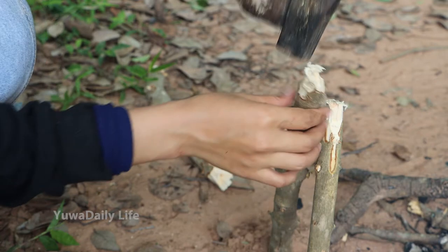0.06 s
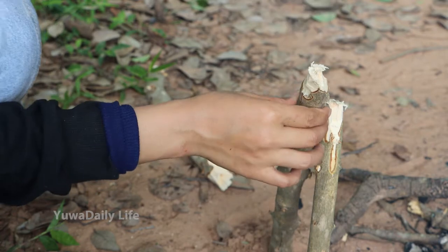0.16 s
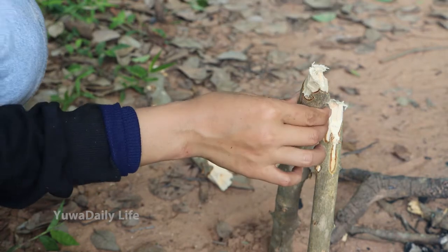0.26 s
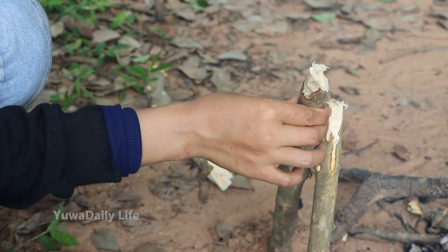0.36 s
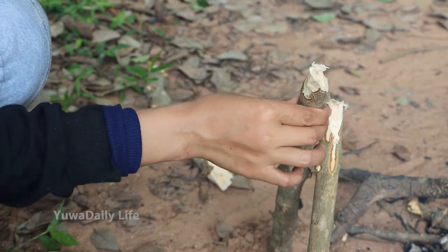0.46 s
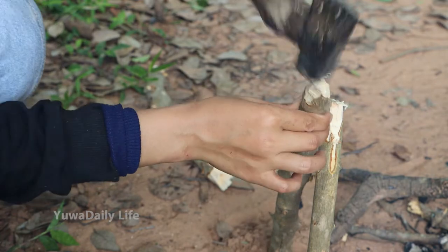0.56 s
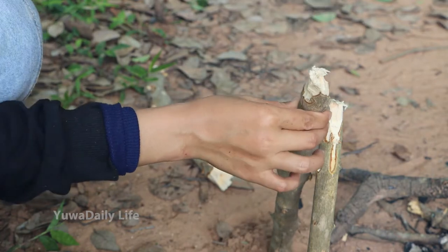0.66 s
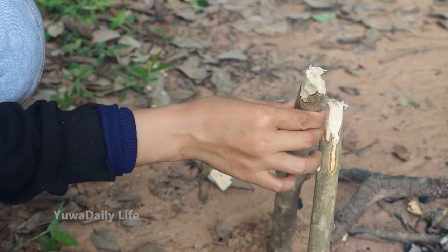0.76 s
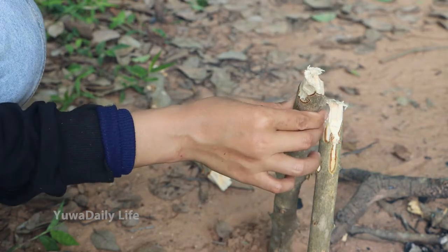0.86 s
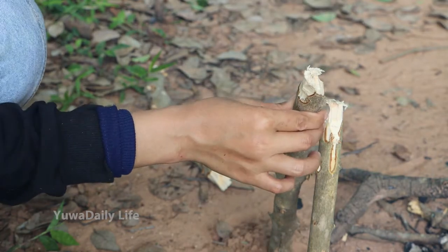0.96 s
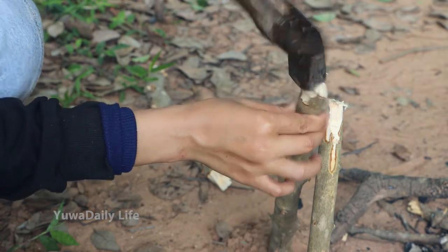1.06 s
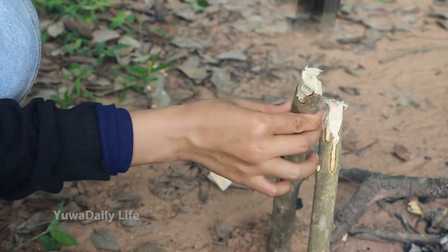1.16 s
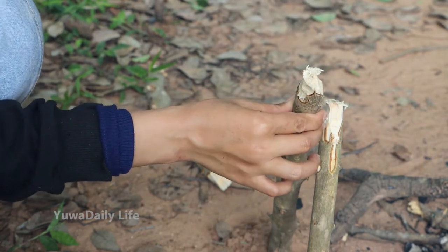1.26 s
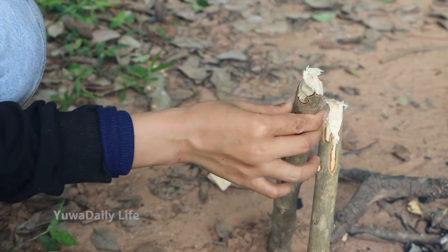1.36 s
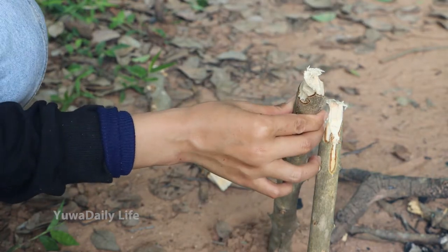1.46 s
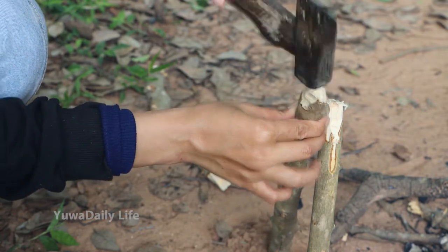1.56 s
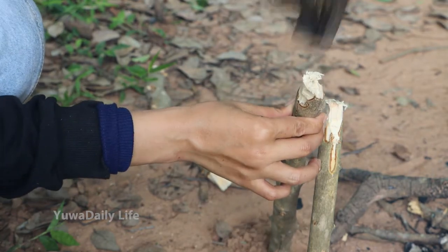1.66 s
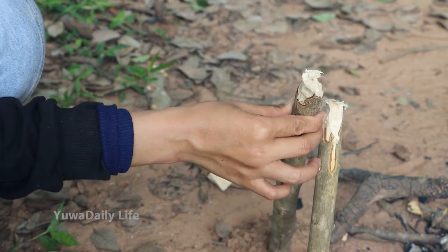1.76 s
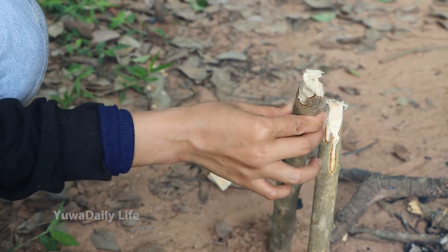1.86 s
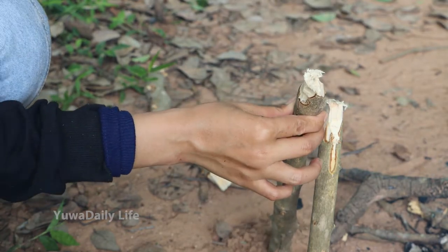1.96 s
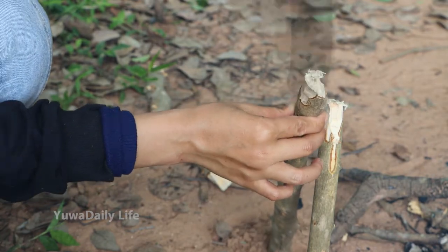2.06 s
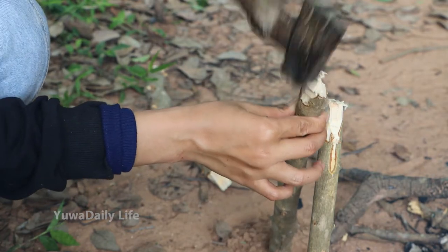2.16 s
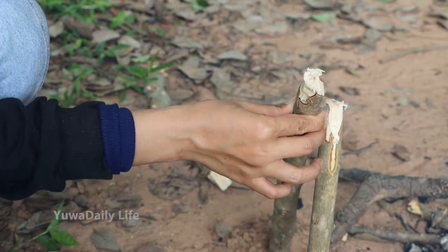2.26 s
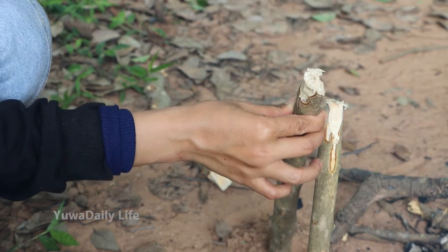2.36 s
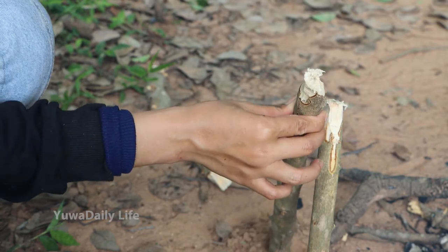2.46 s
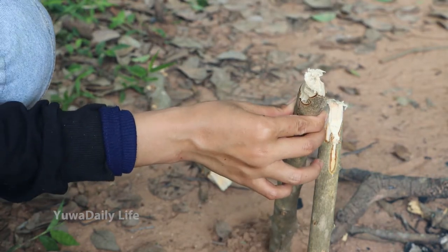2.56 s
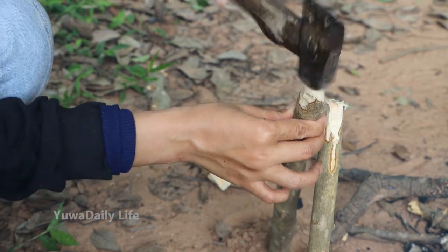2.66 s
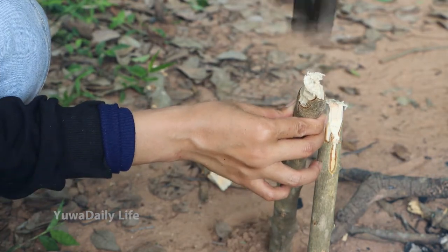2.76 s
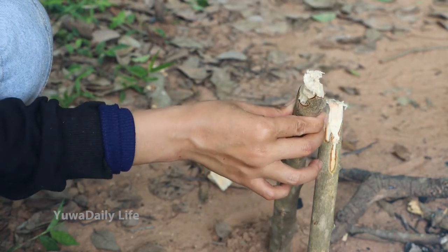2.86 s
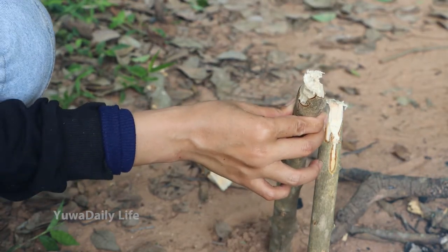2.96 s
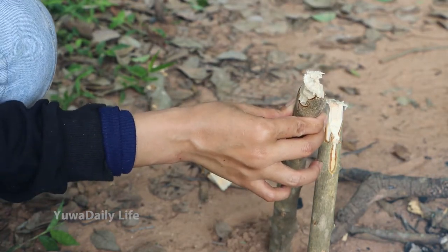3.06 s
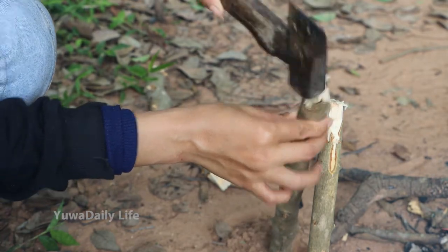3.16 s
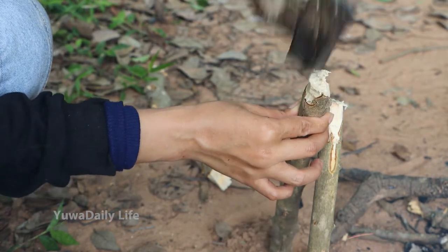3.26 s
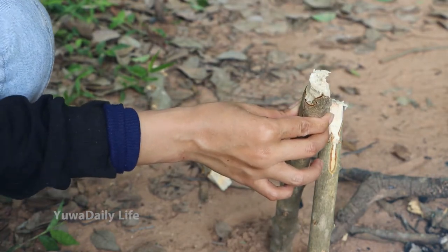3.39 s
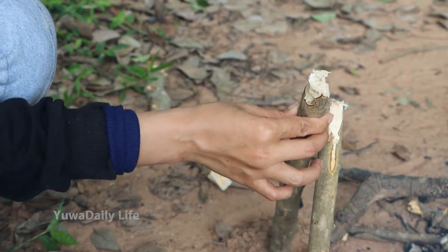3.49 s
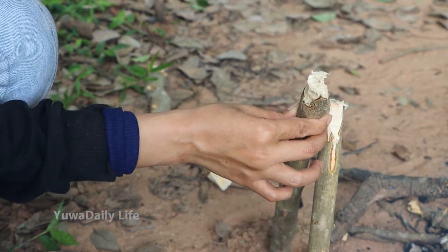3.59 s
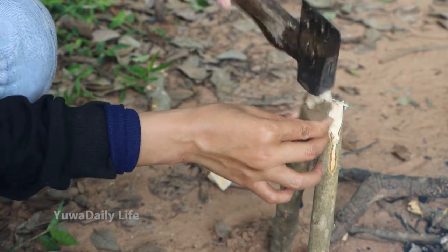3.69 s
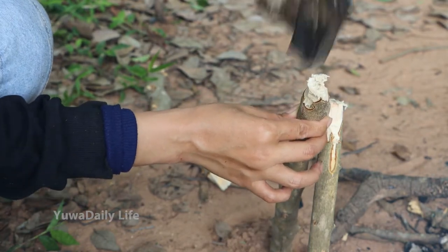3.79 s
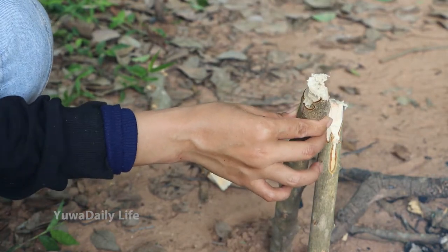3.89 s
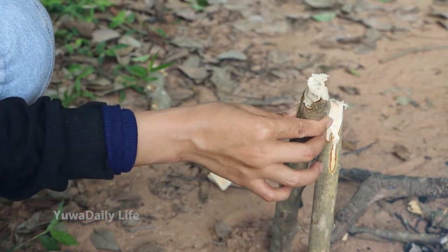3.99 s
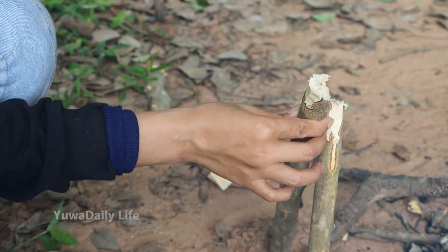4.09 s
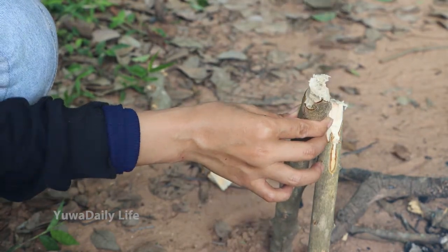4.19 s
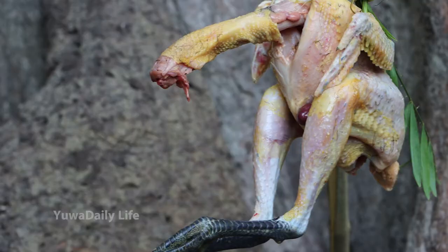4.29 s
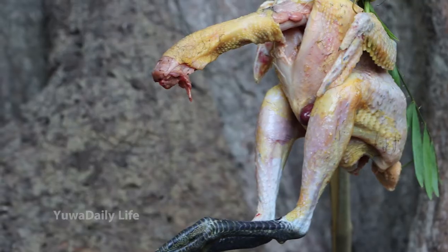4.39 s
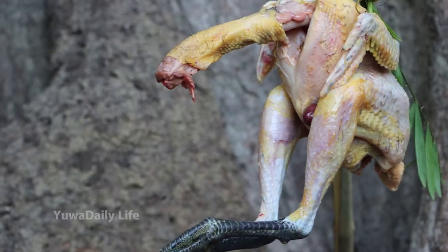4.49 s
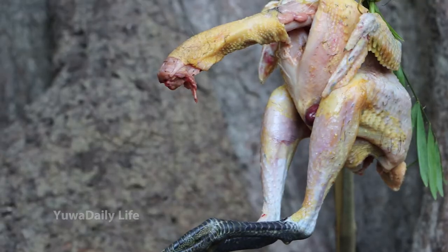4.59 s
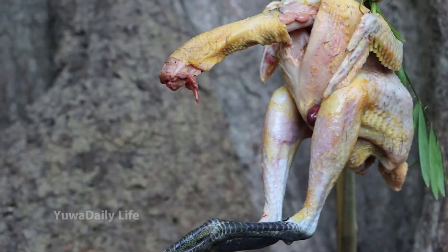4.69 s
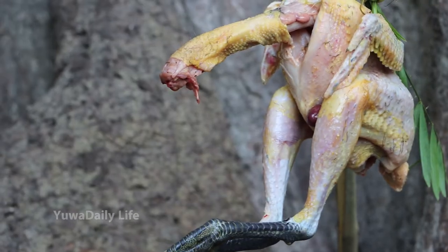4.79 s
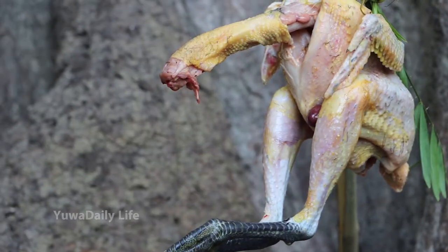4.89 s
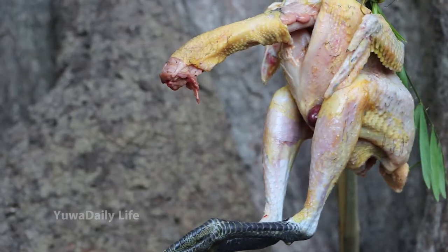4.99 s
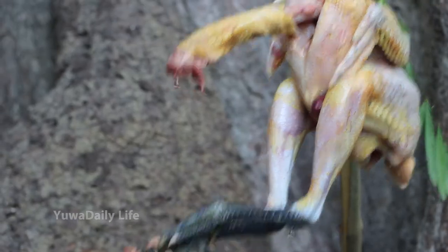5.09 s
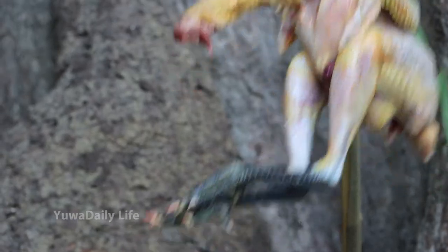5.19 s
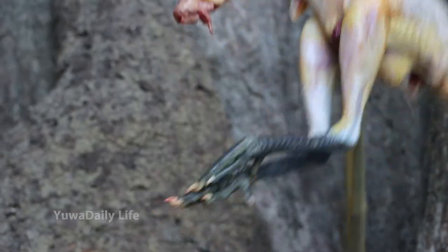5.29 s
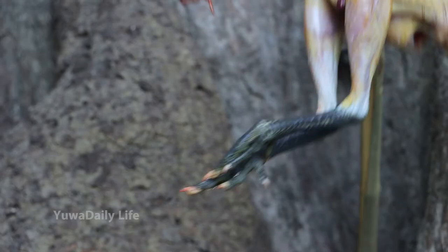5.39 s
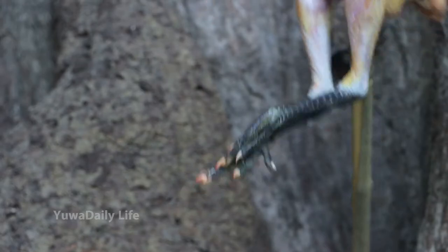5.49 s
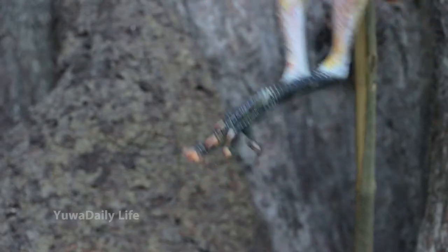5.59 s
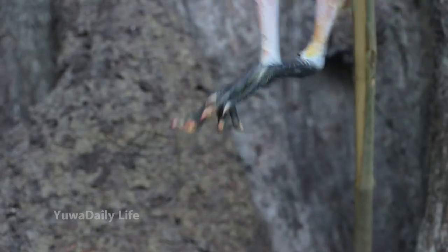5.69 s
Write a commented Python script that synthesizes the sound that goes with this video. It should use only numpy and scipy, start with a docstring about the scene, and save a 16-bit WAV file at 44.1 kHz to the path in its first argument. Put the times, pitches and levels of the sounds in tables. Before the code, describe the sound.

In a quiet forest, a steel tool drives a wooden stake into the soil with eight steady blows, about two a second. Each is a sharp crack with a dull thud, some hollow, some clacking, close to a stereo microphone with a faint echo from the trees. A distant bird faintly whistles four falling notes near the end. The sound then cuts to another quiet spot with a light wooden tap and a few clicks.

```python
"""A quiet forest, a stereo pair close to a green wooden stake that one hand steadies. From 0.55 s a steel
tool head drives it into the soil with eight blows: each crushes the frayed top with a crack and shoves the
stake down with a thud; square blows knock hollow, glancing ones clack. The trees scatter a faint tail back
and crumbs of bark fall. Near 3.5 s a far bird whistles four falling notes. At 4.35 s the sound cuts to a
second quiet spot with a wooden tap and a few light handling clicks."""
import sys
import numpy as np
from scipy import signal
from scipy.io import wavfile

SR = 44100
rng = np.random.default_rng(int(sys.argv[2]) if len(sys.argv) > 2 else 0)


def store_pcm(level_fs):
    """Save levels as 16-bit WAV."""
    pcm = np.round(np.clip(level_fs, -1, 1) * 32767).astype(np.int16)
    wavfile.write(sys.argv[1], SR, np.atleast_2d(pcm).T)


N = 253133
TIME = np.arange(N) / SR
HIT_TIME = TIME[:SR // 8]
FIRST_SPOT_END_S, SECOND_SPOT_START_S = 4.340, 4.351

# blows on the stake: (time [s], relative thud level [dB], hollowness [dB]: square + or glancing -,
# hardness [dB], pitch of the crack [Hz])
BLOWS = [(0.5505, -2, -0.8, -1.0, 6000), (1.0794, -0.6, 4, -1.65, 4270), (1.6013, 1.1, -3, 2.6, 4200),
         (2.138, 0.4, 3.5, 0.5, 2000), (2.6835, 1.2, -3.6, -3.4, 1500), (3.2107, 0.9, 6, 2.6, 1750),
         (3.7266, 1.2, -0.8, 0.0, 2300), (4.2793, 1.4, -3.2, -4.4, 1750)]
# twigs, leaves and fingers at both spots: (time [s], level [dB], centre [Hz], width [octaves], length [s])
TICKS = [(0.778, -64.5, 12600, 0.75, .0033), (1.26, -55.5, 110, 1.1, 0.037), (2.080, -62, 4200, 0.94, .003),
         (3.646, -60.5, 650, 2.9, .012), (3.854, -64, 7900, 1.4, 0.0066), (4.513, -60, 593, 3.2, 0.015),
         (4.819, -63, 2800, 3.4, 0.0038), (4.986, -52, 4600, 2.3, .009), (5.370, -67, 3500, 1.2, .01),
         (5.438, -58, 5000, 2.1, .009)]


def from_db(db):
    """Decibels to gain."""
    return 10 ** (np.asarray(db) / 20)


def at_hz(points, hz):
    """Read a spectrum on a log-frequency axis."""
    frequencies, values = np.transpose(points)
    return np.interp(np.log(hz), np.log(frequencies), values)


def add(out, s, sound):
    """Mix a sound in at a time."""
    start = round(s * SR)
    out[:, start:start + sound.shape[-1]] += sound[..., :N - start]


def unit_hit(x):
    """Scale to the energy of 5 ms at rms 1."""
    return x / np.sqrt(np.sum(x ** 2, axis=-1, keepdims=True) / (.005 * SR) + 1e-20)


def band(x, low_hz, high_hz, order=2):
    """Butterworth band-pass."""
    edges = [low_hz, min(high_hz, .45 * SR)]
    return signal.sosfilt(signal.butter(order, edges, "band", fs=SR, output="sos"), x + 1e-18)


def pan(left_db):
    """Gains of the left and right microphone."""
    return from_db(np.array([[left_db], [-left_db]]) / 2)


def diffuse(spectrum, size, t60s=None):
    """Noise reaching the pair from all around in half-octave bands, steady or dying by band; rms 1."""
    # how alike the two microphones hear it: (frequency [Hz], correlation [-1 to 1])
    likeness = [(90, 1), (180, 0.8), (550, 0.73), (1650, 0.17), (5000, -0.03), (15000, 0)]
    # its lean across the pair: (frequency [Hz], left over right [dB])
    balance = [(60, -1), (550, 0), (1650, -2), (5000, -0.56), (15000, -3.5)]
    out, edges = 0, np.geomspace(22, 14200, 20)
    white = rng.standard_normal((2, 2, size))
    for k, (low, high) in enumerate(zip(edges, edges[1:])):
        mid, side = band(white[k % 2], low, high)
        hz = np.sqrt(low * high)
        alike = np.clip(at_hz(likeness, hz), -1, 1)
        fade_db = -60 * TIME[:size] / at_hz(t60s, hz) if t60s else 0
        pair = np.sqrt(1 + alike) * mid + np.sqrt(1 - alike) * side * [[1], [-1]]
        out = out + from_db(at_hz(spectrum, hz) + fade_db) * pair * pan(at_hz(balance, hz))
    return out / np.sqrt(np.mean(out ** 2))


def forest_air():
    """Still air around the stake: a low hush that eases slightly."""
    # colour of the air: (frequency [Hz], relative density [dB])
    spectrum = [(25, -17.5), (50, -7), (85, 0), (130, -4), (200, -9.5), (400, -13.5), (800, -14),
                (1500, -14.5), (3000, -17.5), (6000, -21), (8500, -26), (10000, -31), (12800, -27),
                (14000, -34)]
    # strength of the air: (time [s], level [dB])
    levels = [(0, -66.5), (2, -68.5), (4.3, -69)]
    return from_db(np.interp(TIME, *np.transpose(levels))) * diffuse(spectrum, N)


def second_spot_air():
    """Still air at the second spot: a little louder at first, then settling."""
    # colour of the air: (frequency [Hz], relative density [dB])
    spectrum = [(15, -55), (25, -20), (97, -2.5), (130, 1), (170, -10), (285, -8), (734, -10.5),
                (2110, -12.5), (2350, -16), (3080, -14.5), (9320, -21), (13200, -28.5), (16000, -52)]
    # strength of the air: (time [s], level [dB])
    levels = [(4.35, -65), (4.6, -65.5), (4.9, -67.5), (5.7, -68)]
    return from_db(np.interp(TIME, *np.transpose(levels))) * diffuse(spectrum, N)


def waver(t, per_s=36):
    """Random wander with a spread of about 1."""
    return np.interp(t * per_s, np.arange(64), rng.standard_normal(64))


def far_bird():
    """Thin whistled notes that swell, sag in pitch and fade, fluttering on their way through the trees."""
    # notes, stepping down: (time [s], length [s], starting pitch [Hz], level [dB])
    notes = [(3.455, .045, 3040, -72.5), (3.52, .08, 2840, -80), (3.6, 0.14, 2530, -75.5),
             (3.77, .29, 1960, -75)]
    first_hz = notes[0][2]
    sag_hz_per_s, settle_s, flutter_db = 1300, .07, 2.5
    out = np.zeros((2, N))
    for s, length, start_hz, db in notes:
        t = TIME[:round(length * SR)]
        depth_hz = sag_hz_per_s * settle_s * (start_hz / first_hz) ** 2   # lower notes sag less
        sag_hz = depth_hz * (1 - np.exp(-t / settle_s))
        hz = (start_hz - sag_hz) * (1 + .004 * waver(t))
        level = from_db(db + flutter_db * waver(t)) * np.sqrt(np.sin(np.pi * t / length))
        add(out, s, level * np.sin(2 * np.pi * np.cumsum(hz) / SR))
    return out


def echo(spectrum, near_db, near_t60, far_db):
    """Nearby ground scatters the sound at once, the trees send back a longer, fainter tail."""
    # decay among the trees: (frequency [Hz], t60 [s])
    tree_t60s = [(100, .33), (600, 0.77), (2000, 0.73), (5000, .45), (13000, .38)]
    size = SR * 3 // 5
    near = diffuse(spectrum, size, [(100, near_t60), (10000, near_t60)])
    far = diffuse(spectrum, size, tree_t60s) * (1 - np.exp(-TIME[:size] / .004))
    return (from_db(near_db) * near + from_db(far_db) * far) / np.sqrt(size)


def ticks(rows):
    """Each tick is a sharp snap and a tiny burst of crackle around one pitch."""
    out = np.zeros((2, N))
    for s, db, hz, octaves, length in rows:
        shared, own = rng.standard_normal((2, len(HIT_TIME))) * np.exp(-3 * HIT_TIME / length)
        shared[0] += 5.5   # the snap
        pair = shared + .5 * own * [[1], [-1]]
        spread = 2 ** (octaves / 2)
        add(out, s, from_db(db) * unit_hit(band(pair, hz / spread, hz * spread)))
    return out


def faint_ticks(times, db, hz, length_s):
    """Tiny ticks that differ by chance in strength and pitch."""
    chance = rng.standard_normal((len(times), 2))
    return ticks([(s, db + 2 * louder, hz * 2 ** (.2 * higher), 1.2, length_s)
                  for s, (louder, higher) in zip(times, chance)])


def bark_crumbs():
    """Most blows shake a crumb of bark loose, which lands on the litter soon after."""
    loose_chance, fall_s = .7, (.07, .25)
    draws = rng.random((len(BLOWS), 2))
    times = [s + np.interp(fall, [0, 1], fall_s)
             for (s, *_), (loose, fall) in zip(BLOWS, draws) if loose < loose_chance]
    return faint_ticks(times, db=-69.5, hz=9500, length_s=.003)


def handling_clicks():
    """Light clicks at the second spot; only the loudest raises a bright, airy echo."""
    # colour of that echo: (frequency [Hz], relative density [dB])
    echo_spectrum = [(60, -11), (400, -16), (1500, -2), (4000, 2), (9000, -2), (14000, -3)]
    out = ticks([row for row in TICKS if row[0] > SECOND_SPOT_START_S])
    add(out, 4.986, echo(echo_spectrum, near_db=-37, near_t60=.04, far_db=-25.5))
    return out


def ring(push, hz, t60):
    """One damped resonance."""
    radius, angle = from_db(-60 / (t60 * SR)), 2 * np.pi * hz / SR
    return signal.lfilter([1, 0, -1], [1, -2 * radius * np.cos(angle), radius ** 2], push + 1e-18)


def swell(peak_s, sharpness):
    """A push that rises from nothing to 1 and lets go."""
    u = HIT_TIME / peak_s
    return (u * np.exp(1 - u)) ** sharpness


def strike(modes, contact_s, crush_s, crush_sharpness, rough_hz, apart_hz, left_lag_s=0):
    """The tool lands, crushes fibres for a moment and lets go; all three set the modes ringing."""
    out, crush = 0, swell(crush_s, crush_sharpness)
    crush /= np.sqrt(np.sum(crush ** 2))
    contact = np.zeros(len(HIT_TIME))
    contact[[0, round(contact_s * SR)]] = -1, .39   # landing, release
    for hz, db, t60, left_db in modes:
        shared, own = rng.standard_normal((2, len(HIT_TIME))) * crush
        # high modes feel mostly the crushing, and reach the two microphones less alike
        crackle = shared + own * [[1], [-1]] * hz / (hz + apart_hz)
        push = contact + crackle * (hz / rough_hz) ** 1.3
        rung = band(ring(push, hz, t60), hz / 1.41, hz * 1.39, order=1)
        out = out + from_db(db) * pan(left_db) * unit_hit(rung)
    left = np.interp(HIT_TIME - left_lag_s, HIT_TIME, out[0], left=0)
    return np.array([left, out[1]])


def wooden_tap(s):
    """One light, short contact rings a piece of wood at the second spot."""
    # modes of the wood: (frequency [Hz], relative level [dB], t60 [s], left over right [dB])
    modes = [(386, -50.5, 0.072, 0), (845, -52, 0.014, 0), (1090, -48, 0.018, 0), (2220, -49.5, 0.0083, 0),
             (2630, -47.5, .012, 0), (4500, -51, 0.0083, 0), (6030, -55, 0.0098, 0), (8600, -54, 0.0047, 0),
             (10640, -52.5, 0.0044, 0)]
    out = np.zeros((2, N))
    tap = strike(modes, contact_s=.0005, crush_s=.00034, crush_sharpness=1.4, rough_hz=2976, apart_hz=5000)
    add(out, s, from_db(-1.5) * tap)
    return out


def thud(soil_db, shudder_db, judder_db):
    """The stake sinks and the soil gives, so the pitch drops; then the stake shudders in its hole."""
    hz = 100 + 380 * np.exp(-HIT_TIME / .005)
    shove = -swell(peak_s=.0064, sharpness=3) * np.sin(2 * np.pi * np.cumsum(hz) / SR)
    soil = swell(peak_s=.012, sharpness=1.3) * np.sin(2 * np.pi * 92 * HIT_TIME)
    shudder_hz = 207 * (1 + .04 * rng.standard_normal())
    shudder = swell(peak_s=.029, sharpness=27) * np.sin(2 * np.pi * shudder_hz * HIT_TIME)
    # the bark rubs unevenly against the earth
    rub = band(rng.standard_normal(len(HIT_TIME)), 130, 290, order=3)
    judder = unit_hit(rub * swell(peak_s=.027, sharpness=4))
    motion = shove + from_db(soil_db) * soil + from_db(shudder_db) * shudder + from_db(judder_db) * judder
    return band(motion, 62, 2998)   # the small patch of moving soil gives off little deep bass


def near_pitch(hz, centre_hz, octaves=.2):
    """1 at a pitch, falling to 0 on either side."""
    return np.exp(-.5 * (np.log2(hz / centre_hz) / octaves) ** 2)


def favour_db(hz, hollow_db, hard_db, crack_hz):
    """A square blow feeds the knock and its overtone, a glancing one the clack, a hard one the treble."""
    knock_hz, overtone_hz, clack_hz, hard_above_hz = 1170, 3170, 1650, 1730
    hollow = near_pitch(hz, knock_hz) + .5 * near_pitch(hz, overtone_hz) - .9 * near_pitch(hz, clack_hz)
    treble = 1 / (1 + (hard_above_hz / hz) ** 4)
    # splitting fibres favour the modes around their own pitch
    crack_db = 3.5 * near_pitch(hz, crack_hz, octaves=.26)
    return hollow_db * hollow + hard_db * treble + crack_db


def hammering():
    """Close to the pair, each blow favours other modes of the stake and wakes the echo of the clearing."""
    # modes of stake and tool head: (frequency [Hz], base level [dB], t60 [s], left over right [dB])
    stake_modes = [(327, -41, 0.067, 2.5), (601, -32, 0.02, -4.5), (730, -30.5, 0.022, -1),
                   (1138, -29.5, 0.013, -5), (1253, -30, .015, 1), (1578, -27, 0.0093, -6),
                   (1787, -26.5, 0.013, -3.5), (2127, -43, 0.042, -4), (2304, -30, 0.015, -8.5),
                   (2570, -28.5, .011, -9), (3210, -29, 0.01, -2.5), (3830, -34, 0.0056, -1),
                   (4170, -34.5, .013, 0), (5740, -40.5, 0.0074, 0), (6630, -49, 0.0035, -2),
                   (8350, -45.5, .013, -3.5), (11400, -48, 0.0048, -3.5), (13200, -46.5, 0.0076, -0.5)]
    # colour of the echo from litter and trees: (frequency [Hz], relative density [dB])
    echo_spectrum = [(60, -5.5), (150, 5.5), (300, 2), (500, -4.5), (900, -4), (1500, -0.5), (2500, 0.5),
                     (4600, -2.5), (7000, -10.5), (10000, -15), (14000, -14.5)]
    echo_share = .55   # how much of a blow's hardness and colour shows in its echo
    out = np.zeros((2, N))
    for s, thud_db, hollow_db, hard_db, crack_hz in BLOWS:
        landing = hollow_db, hard_db, crack_hz
        modes = [(hz, db + favour_db(hz, *landing), t60, left_db) for hz, db, t60, left_db in stake_modes]
        contact_s = .0023 * (1 + .03 * rng.standard_normal())
        add(out, s, strike(modes, contact_s, crush_s=.0011, crush_sharpness=2.9,
                           rough_hz=1800, apart_hz=3600, left_lag_s=.00003))
        add(out, s, from_db(thud_db - 22) * thud(soil_db=-21, shudder_db=-22.5, judder_db=-25.5))
        colour = [(hz, db + echo_share * favour_db(hz, *landing)) for hz, db in echo_spectrum]
        tail = echo(colour, near_db=-14.5, near_t60=.049, far_db=-20.5)
        add(out, s, from_db(echo_share * hard_db) * tail)
    return out


def scene():
    """The pair beside the stake, an instant of silence, then the second spot, heard about centred."""
    first = forest_air() + hammering()
    first += ticks([row for row in TICKS if row[0] < FIRST_SPOT_END_S])
    first += far_bird() + bark_crumbs()
    tap_s = 4.3593
    second = handling_clicks() + wooden_tap(tap_s) + second_spot_air()
    rustle_times = rng.uniform(tap_s, TIME[-1], size=3)
    second += faint_ticks(rustle_times, db=-72, hz=4190, length_s=.0065)
    return first * (TIME < FIRST_SPOT_END_S) + second * pan(left_db=1) * (TIME > SECOND_SPOT_START_S)


def record(dry):
    """A steep low-pass takes off the highest treble."""
    stop_hz = 16500
    return signal.sosfilt(signal.cheby2(14, 60, stop_hz, fs=SR, output="sos"), dry)


dry = scene()
out = record(dry)
store_pcm(out)
```